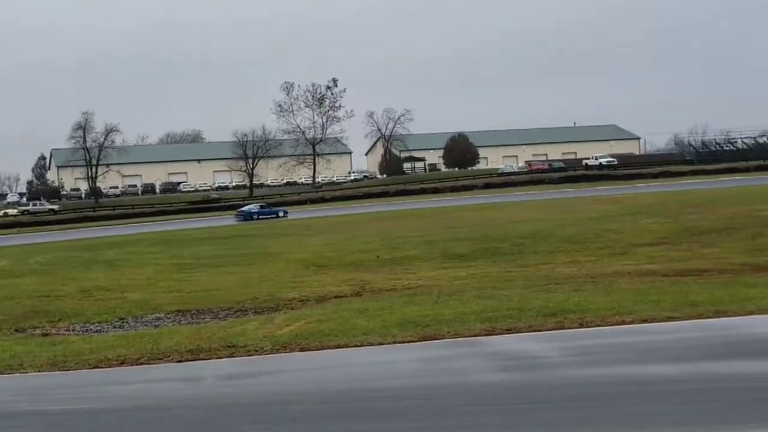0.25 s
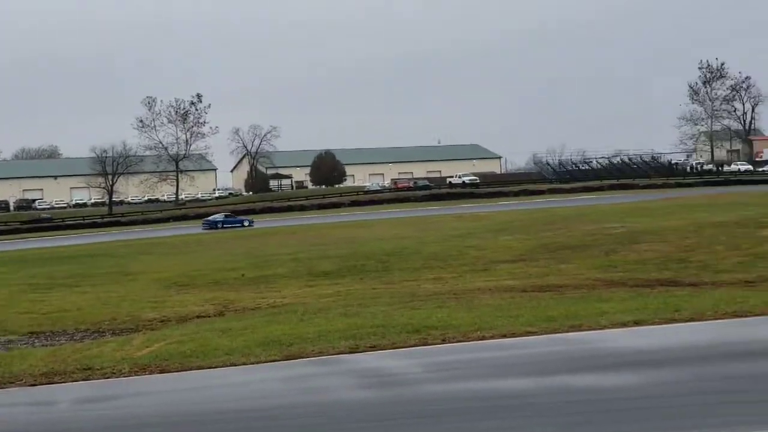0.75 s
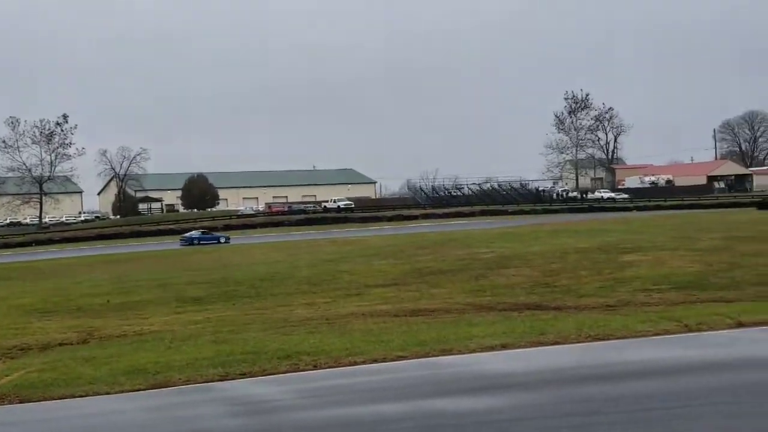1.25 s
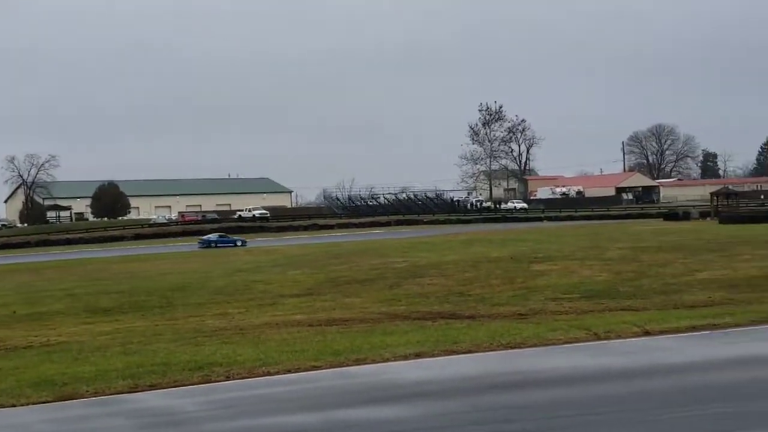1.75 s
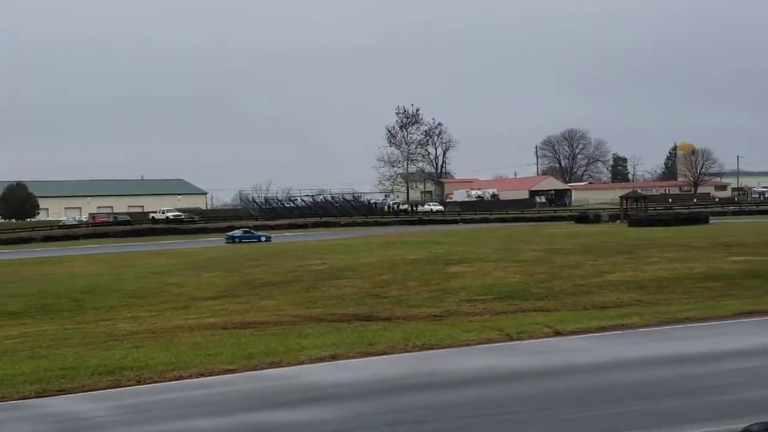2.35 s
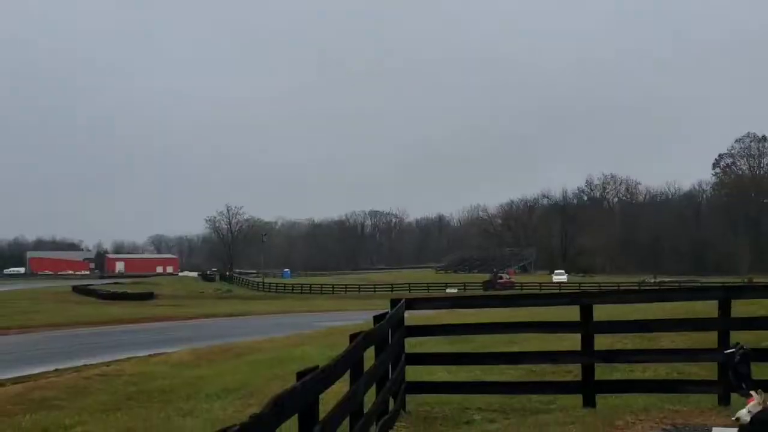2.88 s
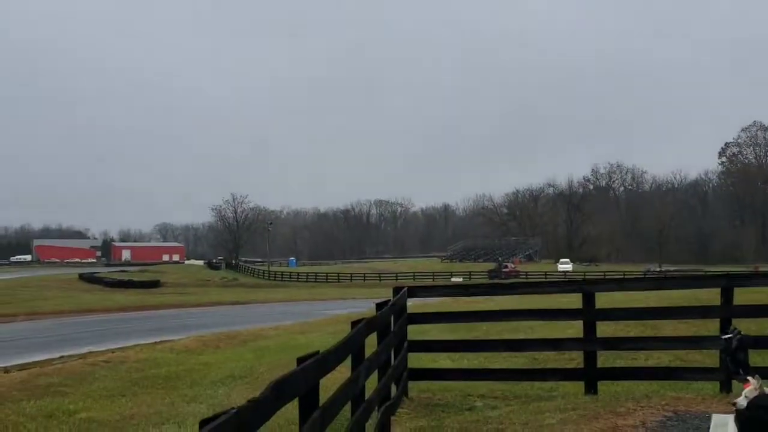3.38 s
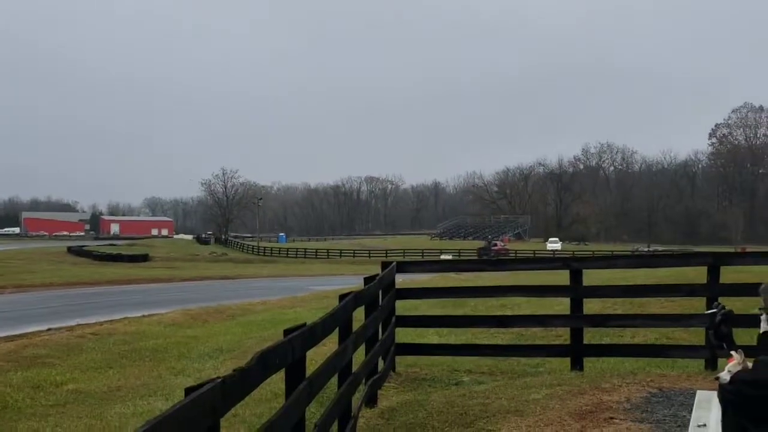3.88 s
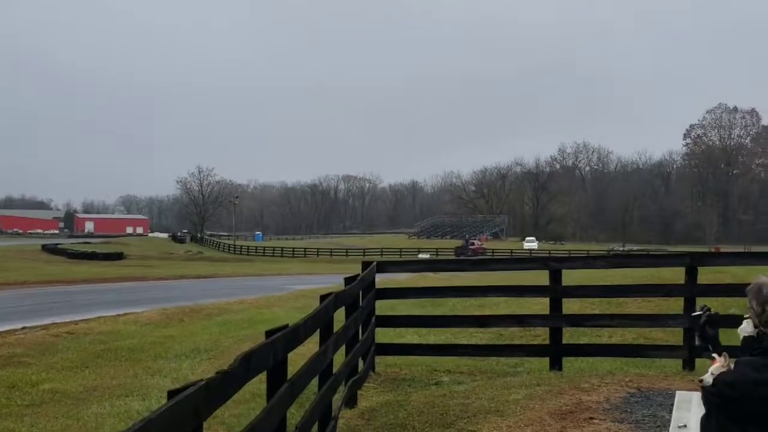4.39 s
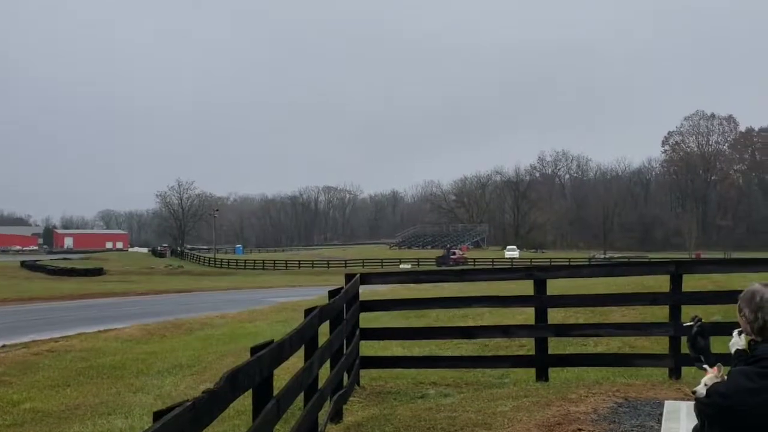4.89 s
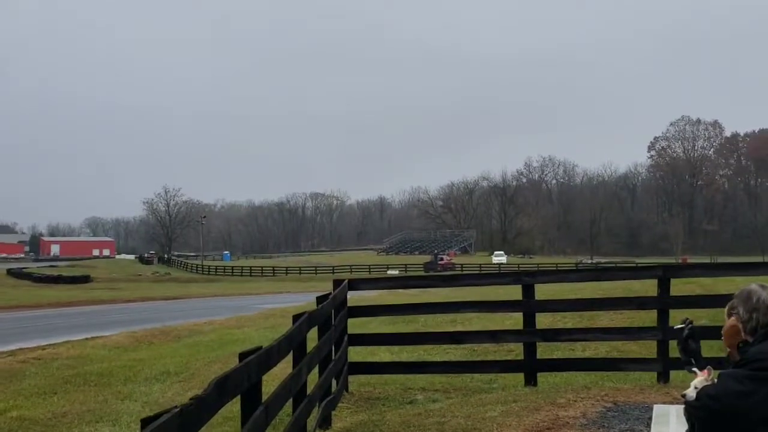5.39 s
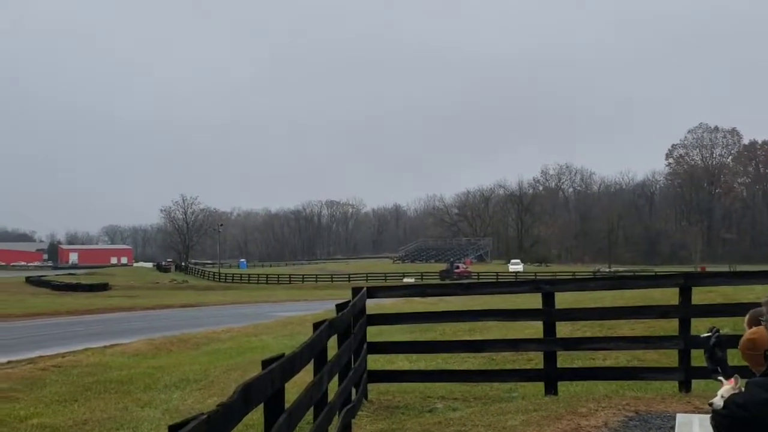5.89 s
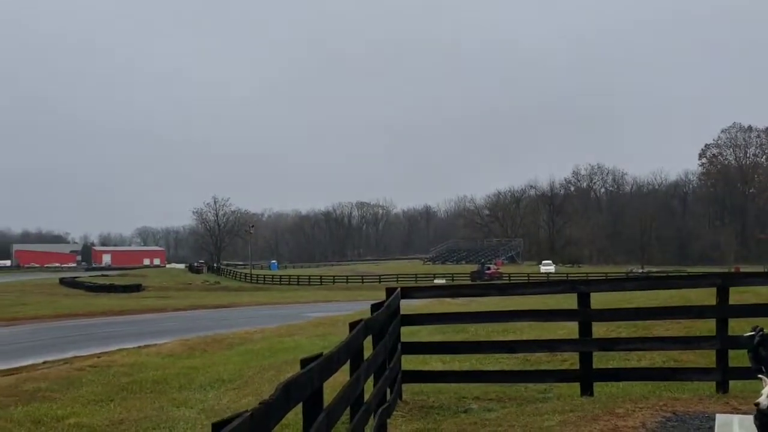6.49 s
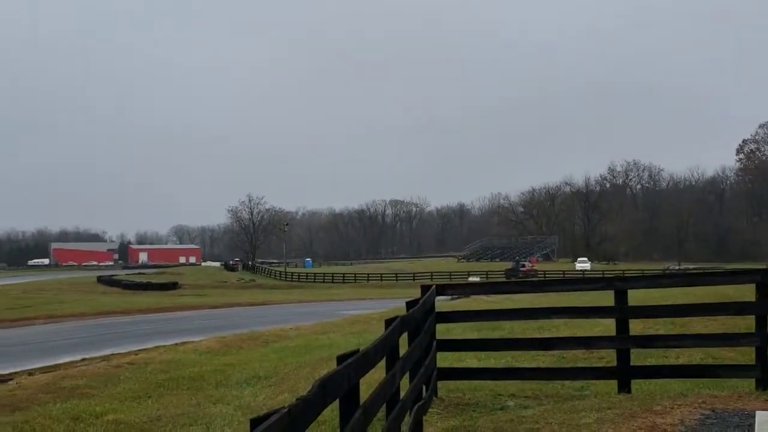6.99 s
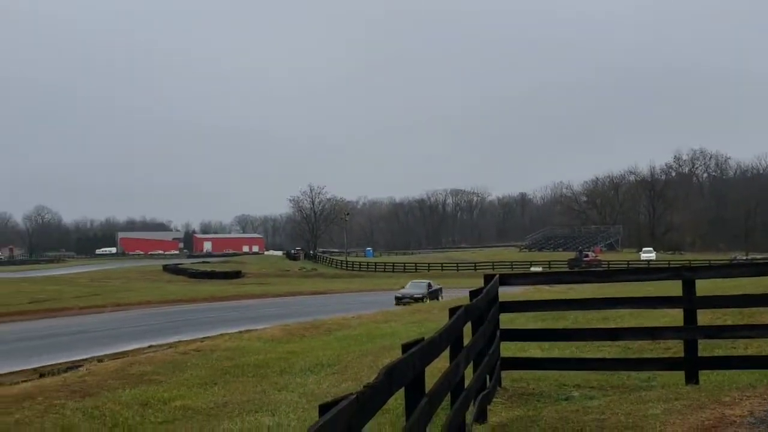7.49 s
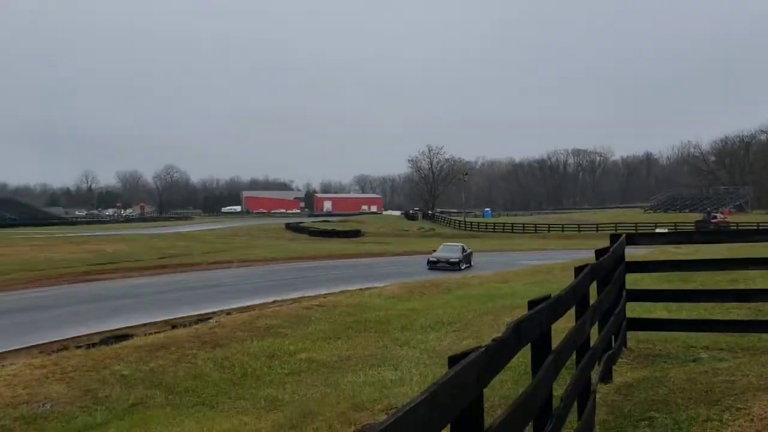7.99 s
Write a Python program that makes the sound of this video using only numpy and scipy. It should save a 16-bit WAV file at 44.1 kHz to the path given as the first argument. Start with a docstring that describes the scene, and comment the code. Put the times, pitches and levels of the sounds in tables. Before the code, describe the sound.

A loud car engine snarls and hisses over wet asphalt, coasts off, then after a brief cut another revs, squeals its tyres and accelerates nearer.

```python
"""Drift cars on a wet circuit

Heard across the grass from two spots with a short silent cut between them. A coupe slides on the throttle, then
coasts off through the spray; next, a far car pulls away while a drifter revs, lifts, squeals through the bend and
accelerates nearer over the paddock's drone. Engines are sums of sines locked to the engine cycle, squealing tyres
are gliding harmonics, both with a noise echo; gas, spray, road, rumble and rustles are coloured noise.
"""
import sys
import numpy as np
from scipy import signal
from scipy.fft import rfft, irfft, next_fast_len
from scipy.io import wavfile
from scipy.ndimage import uniform_filter1d

SR = 44100
rng = np.random.default_rng(int(sys.argv[2]) if len(sys.argv) > 2 else 0)


def pcm_store(signal):
    """Save signal as 16-bit PCM."""
    levels = np.round(np.clip(np.atleast_2d(signal), -1, 1) * 32767)
    wavfile.write(sys.argv[1], SR, levels.astype(np.int16).T)


N = 363823
TIME = np.arange(N) / SR

# engine speed of the sliding coupe: t/s, firing rate f/Hz
COUPE_REVS = [(0, 202.6), (.2, 194.2), (.39, 181.8), (.6, 186.7), (.84, 189.5), (1.01, 217.2),
              (1.15, 210.2), (1.64, 208.3), (2.0, 170), (2.45, 135), (2.85, 115)]
# its firing tone: t/s, level/dB
COUPE_TONE = [(0, -24), (.4, -27.5), (.82, -27.5), (1.0, -40), (1.1, -33), (1.5, -23), (1.75, -31.5),
              (2.12, -39), (2.45, -31.5), (2.85, -35.5)]
# lines around the firing tone: multiple of the cycle rate, relative level/dB
COUPE_BOOM = [(1, -14.5), (2, -6.5), (3, -21), (5, -22), (6, -11.5), (7, -25), (8, -12)]
# bark lines, cycle multiples 9 to 18: relative level/dB
COUPE_BARK = [-1.5, -4.5, -10.5, -7.5, -8, -4, -10.5, -18.5, -7, -15]
# exhaust colours for boom, bark and rasp: f/Hz, level/dB
BOOM_PIPE = [(40, -11.5), (100, 6.5), (200, 2), (280, 5), (370, 0), (420, -9.5)]
COUPE_PIPE = [(300, -25), (520, -14.5), (625, 3), (655, 6.5), (700, -3.5), (740, -6), (900, -10.5)]
RASP_COLOUR = [(900, 5.5), (1020, -7.5), (1220, 0), (1370, -1), (1430, 7), (1490, -2), (1620, -2.5),
               (1730, -30), (1900, -5), (2060, 0.5), (2300, -23), (2650, -3.5), (3000, -28.5)]
# the driver lifts: the bark drops at once, then dies away
LIFT_S, LIFT_TAKES_S, LIFT_DROP_DB, COAST_DB_PER_S = 1.63, 0.08, 9, 23
COUPE_BARK_DB, RASP_RE_BARK_DB = -42.5, -12
# the boom grows with the revs and weakens at the lift
BOOM_DB, BOOM_DB_PER_OCTAVE, BOOM_DROP_DB = -31, 17, 6.5


def coupe_exhaust():
    """Firing pulses make lines at multiples of the engine cycle; bark and rasp need an open throttle."""
    hz, = curves(COUPE_REVS)
    tone_db, = curves(COUPE_TONE)
    octaves, coasting = np.log2(hz / hz[0]), since(LIFT_S)
    lifted = np.minimum(coasting / LIFT_TAKES_S, 1)
    boom_db = BOOM_DB + BOOM_DB_PER_OCTAVE * octaves - BOOM_DROP_DB * lifted
    bark_db = COUPE_BARK_DB - LIFT_DROP_DB * lifted - COAST_DB_PER_S * coasting

    unsteady = 0.0031 * walk(45)  # shared, so all lines waver in pitch together
    boom_orders, boom_strength_db = np.transpose(COUPE_BOOM)
    bark_orders, rasp_orders = np.arange(9, 19), np.arange(19, 58)
    tone = lines(hz, [4], [0], BOOM_PIPE, unsteady, flutter_db=1.1)
    boom = lines(hz, np.round(boom_orders), boom_strength_db, BOOM_PIPE, unsteady, flutter_db=1.8)
    bark = lines(hz, bark_orders, COUPE_BARK, COUPE_PIPE, unsteady, flutter_db=1.5)
    rasp = lines(hz, rasp_orders, -5 * (rasp_orders % 2), RASP_COLOUR, unsteady, flutter_db=5.5)

    exhaust = tone * undb(tone_db) + boom * undb(boom_db)
    exhaust += (bark + rasp * undb(RASP_RE_BARK_DB)) * undb(bark_db)
    return outdoors(exhaust, wet_db=-14, t60=1.0)


# gas colour: f/Hz, level/dB
GAS_COLOUR = [(300, 6), (480, 8.5), (660, 14), (950, -3), (1400, 3.5), (1720, -12), (2050, -4.5),
              (2330, -6), (2680, -2.5), (3500, -2), (5000, -30.5)]
# the rush grows with the revs and fades as the coupe drives away
GAS_DB, GAS_DB_PER_OCTAVE, GAS_DB_PER_S = -47.5, 6.5, -4


def coupe_gas(hz, puffs):
    """Exhaust gas rushes as noise, puffing with each turn of the crank."""
    octaves = np.log2(hz / hz[0])
    return noise(GAS_COLOUR) * puffs * undb(GAS_DB + GAS_DB_PER_OCTAVE * octaves + GAS_DB_PER_S * TIME)


# colours of spray, mist and finest mist: f/Hz, level/dB
SPRAY_COLOUR = [(900, -18), (2000, -4.5), (3000, -7.5), (3350, -6), (3620, 2), (3950, -4.5), (4270, -3),
                (4550, -18.5), (6000, -44)]
MIST_COLOUR = [(2650, -36.5), (4500, -4.5), (5340, -1), (6540, 1.5), (7290, -4.5), (7970, -4.5),
               (9070, -18), (10700, -19), (15600, -39)]
FINE_COLOUR = [(8500, -4), (10000, -2), (11600, 2.5), (13000, -6), (15600, -21.5)]
# standing water under the wheels: t/s, length/s, rise of the spray level/dB
COUPE_PUDDLES = [(-.1, 0.32, 5), (.52, .2, 5), (.93, 0.45, 5.5), (1.88, 0.088, 3), (2.2, .3, 2.5)]
SPRAY_DB, SPRAY_DB_PER_S = -55.5, -0.5
# both mists fade from the lift on; distance takes away the finest first
MIST_DB, MIST_DB_PER_S, FINE_DB, FINE_DB_PER_S = -63, -7, -73.5, -17


def coupe_water(puffs):
    """Tyres throw up water: hissing noise that swells in the puddles."""
    coasting, water_db = since(LIFT_S), splash_db(COUPE_PUDDLES)
    spray_db = SPRAY_DB + SPRAY_DB_PER_S * TIME + water_db + 0.64 * walk(20)
    spray = noise(SPRAY_COLOUR) * puffs ** 0.2 * undb(spray_db)
    mist = noise(MIST_COLOUR) * undb(MIST_DB + MIST_DB_PER_S * coasting)
    mist += noise(FINE_COLOUR) * undb(FINE_DB + FINE_DB_PER_S * coasting)
    return spray + mist * undb(0.77 * water_db + 0.62 * walk(25))


# low rumble, also heard at the bend: f/Hz, level/dB
RUMBLE_COLOUR = [(20, -23.5), (35, -21.5), (55, -9), (80, -0.5), (115, 3), (160, -0.5), (230, -7),
                 (300, -15), (420, -28), (700, -48)]
COUPE_RUMBLE_DB = -37
# a kick of the clutch shakes the drivetrain
KICK_S, KICK_LENGTH_S, KICK_RAMP_S, KICK_DB = 0.93, 0.13, 0.13, 2.5


def coupe_rumble():
    """Low noise that the clutch kick lifts briefly."""
    kick = envelope(KICK_S, KICK_LENGTH_S, KICK_RAMP_S, KICK_RAMP_S)
    return noise(RUMBLE_COLOUR) * undb(COUPE_RUMBLE_DB + KICK_DB * kick)


def coupe():
    """Exhaust, gas, water and rumble of the sliding car, with gas and spray pulsing to the same crank."""
    hz, = curves(COUPE_REVS)
    puffs = undb(2.5 * np.cos(np.pi * np.cumsum(hz) / SR))  # one per two firings
    return coupe_exhaust() + coupe_gas(hz, puffs) + coupe_water(puffs) + coupe_rumble()


# a whistle and a chirp: t/s, length/s, first pitch f/Hz, last pitch f/Hz, level/dB, tilt per harmonic/dB
COAST_CHIRPS = [(1.73, .13, 1950, 1803, -61, -2), (1.92, 0.058, 2280, 2290, -57.5, 0)]


def coast_chirps():
    """A brief gliding whistle, then a short chirp, as the coupe coasts."""
    return tyre(COAST_CHIRPS, [0, -16], jitter=0.022, jitter_rate=580, waver=0.012, flutter_db=5.0)


# engine speed of the approaching car: t/s, firing rate f/Hz
DRIFTER_REVS = [(2.9, 113.1), (4.04, 117.8), (4.24, 162.1), (4.34, 145.6), (4.8, 166.5), (5.33, 205.7),
                (5.53, 160), (5.68, 135.3), (6.0, 101.3), (6.48, 112.6), (6.75, 143.4), (7.07, 155),
                (7.26, 143.4), (7.7, 170.8), (8.25, 213.5)]
# its exhaust colour: f/Hz, level/dB
DRIFTER_PIPE = [(45, -10.5), (90, 1.5), (200, 6), (260, -3.5), (305, 0.5), (400, -12), (520, -18),
                (620, -21), (800, -30.5), (1000, -28.5), (2000, -35.5)]
# throttle bursts: t/s, length/s, firing tone level/dB, bark level/dB before it comes nearer
PULLS = [(2.85, 1.1, -38.5, -64), (3.88, .14, -33, -50.5), (4.048, .2, -32, -46),
         (4.333, 0.078, -45.5, -43), (4.43, 0.96, -34.5, -52), (5.42, 0.099, -35, -48.5),
         (6.127, 0.25, -37.5, -58), (6.543, 0.71, -37.5, -53.5), (7.195, 1.2, -37.5, -62.5)]
THROTTLE_OPEN_S, THROTTLE_CLOSE_S = 0.061, 0.06
IDLE_TONE_DB, IDLE_BARK_DB, OVERRUN_BARK_DB = -53.5, -71, -51
# it rounds the bend and comes nearer (used by the road too)
NEARING_S, NEAR_BARK_DB_PER_S = 7.49, 20


def drifter():
    """Throttle bursts open tone and bark; falling revs make the firings ragged."""
    hz, = curves(DRIFTER_REVS)
    overrun = np.clip(-np.gradient(hz) * SR / 150, 0, 1)  # full when falling 150 Hz a second
    overrun = uniform_filter1d(overrun, size=2048)
    tone_gain = undb(IDLE_TONE_DB)
    bark_gain = undb(IDLE_BARK_DB) + undb(OVERRUN_BARK_DB) * overrun
    for s, length, tone_db, bark_db in PULLS:
        throttle = envelope(s, length, THROTTLE_OPEN_S, THROTTLE_CLOSE_S)
        tone_gain = np.maximum(tone_gain, throttle * undb(tone_db))
        bark_gain = np.maximum(bark_gain, throttle * undb(bark_db))
    jitter = 0.0061 + 0.03 * overrun
    boom, bark = engine(hz, DRIFTER_PIPE, crank_db=-24, cycle_db=-27.5, jitter=jitter, flutter_db=0.0)
    bark_gain = bark_gain * undb(NEAR_BARK_DB_PER_S * since(NEARING_S))
    return outdoors(boom * tone_gain + bark * bark_gain, wet_db=-11.0, t60=0.82)


# squeals: t/s, length/s, first slip rate f/Hz, last slip rate f/Hz, level/dB, tilt per harmonic/dB
SQUEALS = [(6.53, .21, 1140, 1170, -46, -1), (6.75, .13, 1205, 1205, -46, 0),
           (6.86, 0.17, 1170, 1179, -48.5, -1), (6.9, 0.24, 1242, 1232, -54.5, -4),
           (7.03, 0.26, 1135, 1186, -56.5, -0.5), (7.11, .16, 1215, 1243, -49, 2.5),
           (7.3, 0.28, 1183, 1163, -54.5, -2), (7.38, .24, 1225, 1259, -58.5, -1),
           (7.62, 0.32, 1198, 1225, -64, -4)]
# harmonics from the first up: relative level/dB
SQUEAL_HARMONICS = [0, 6.5, 1, -13.5, -22.5]


def squeals():
    """Spinning tyres squeal as the tread sticks and slips."""
    return tyre(SQUEALS, SQUEAL_HARMONICS, jitter=0.0142, jitter_rate=400, waver=0.00994, flutter_db=4.0)


# scrubs: t/s, length/s, first slip rate f/Hz, last slip rate f/Hz, level/dB, tilt per harmonic/dB
SCRUBS = [(5.31, .17, 1318, 1560, -61.5, -4), (5.42, 0.32, 1570, 1570, -67.5, -9.5),
          (5.8, 0.18, 1657, 1860, -68, -16), (5.99, 0.12, 1370, 1430, -56.5, -1),
          (6.08, 0.14, 1593, 1578, -56.5, -8.5), (6.22, 0.13, 1369, 1400, -55, -4),
          (6.35, 0.41, 1542, 1569, -58.5, -6), (6.52, 0.24, 1406, 1360, -53, 2.5),
          (6.76, 0.42, 1690, 1671, -62, -15.5), (6.75, .47, 1451, 1425, -56, 1),
          (7.22, 0.55, 1452, 1403, -55, -0.5), (7.2, 0.5, 1633, 1590, -73, -13)]
# harmonics from the first up: relative level/dB
SCRUB_HARMONICS = [1.5, 1.5, -7, -16.5]


def scrubs():
    """Tyres scrub sideways; a less steady slip rate makes the rasp hoarse."""
    return tyre(SCRUBS, SCRUB_HARMONICS, jitter=0.0398, jitter_rate=500, waver=0.025, flutter_db=3.5)


# far car: t/s, firing rate f/Hz, firing tone level/dB
FAR_CAR = [(2.9, 164.4, -41.5), (3.35, 178.9, -38.5), (3.92, 192.9, -38), (4.4, 199.9, -42.5),
           (5.3, 205.2, -43), (6.3, 204, -69)]
# its exhaust colour: f/Hz, level/dB
FAR_PIPE = [(45, -14.5), (90, 5), (180, 4), (270, -2), (350, -3), (460, -28), (560, -21.5), (690, -14.5),
            (900, -43), (2000, -42.5)]


def far_car():
    """A second engine pulls slowly and fades behind the trees."""
    hz, tone_db = curves(FAR_CAR)
    boom, bark = engine(hz, FAR_PIPE, crank_db=-3.5, cycle_db=-13, jitter=0.0051, flutter_db=2.5)
    return outdoors((boom + bark * undb(-12.5)) * undb(tone_db), wet_db=-18, t60=0.75)


# tyre roar and water hiss colours: f/Hz, level/dB
ROAR_COLOUR = [(250, 8), (470, 4), (660, 2), (900, 0), (1120, -4.5), (1600, -3.5), (2000, -7), (2400, -4.5),
               (3100, -16.5), (5000, -26)]
WASH_COLOUR = [(1500, 0.5), (2600, 6.5), (3600, 6.5), (4600, 5), (6000, 0.5), (6800, -11), (8500, -49),
               (11000, -25.5), (15500, -19)]
# standing water at the bend: t/s, length/s, rise of the spray level/dB
BEND_PUDDLES = [(3.37, 0.54, 6), (4.08, 0.26, 5.5), (4.3, 1.2, 4.5), (5.98, 0.86, 6.5), (6.53, 0.42, 10)]
# levels before the car comes nearer; the high sounds then gain most
ROAR_DB, WASH_DB, FAR_MIST_DB = -54, -68, -102
NEAR_ROAR_DB_PER_S, NEAR_WASH_DB_PER_S, NEAR_MIST_DB_PER_S = 7.5, 10.5, 34
# the tyres roar less while they slide
SLIDE_S, SLIDE_LENGTH_S, SLIDE_RAMP_S, SLIDE_DIP_DB = 5.72, 1.05, 0.5, 1.5


def road():
    """Tyres roar on asphalt and hiss through water; the finest spray carries only from close by."""
    nearing = since(NEARING_S)
    slide = envelope(SLIDE_S, SLIDE_LENGTH_S, SLIDE_RAMP_S, SLIDE_RAMP_S)
    roar_db = ROAR_DB - SLIDE_DIP_DB * slide + NEAR_ROAR_DB_PER_S * nearing + 0.63 * walk(14)
    wash_db = WASH_DB + splash_db(BEND_PUDDLES) + NEAR_WASH_DB_PER_S * nearing + 0.89 * walk(17)
    mist = noise([(6500, -2), (8000, 3.0), (10000, -5.5), (14000, -8.0)])
    mist = mist * undb(FAR_MIST_DB + NEAR_MIST_DB_PER_S * nearing)
    return noise(ROAR_COLOUR) * undb(roar_db) + noise(WASH_COLOUR) * undb(wash_db) + mist


# low rumble at the bend: t/s, level/dB
BEND_RUMBLE = [(2.9, -45), (3.3, -41), (4.2, -37), (4.6, -42), (5.7, -40.5), (6.3, -45), (6.8, -41),
               (7.3, -42.5), (8.25, -39)]


def bend_rumble():
    """The circuit rumbles as low noise of changing level."""
    return noise(RUMBLE_COLOUR) * undb(curves(BEND_RUMBLE)[0])


# small ticks close by: t/s, level/dB
TICKS = [(4.129, -54), (4.43, -50), (4.5, -54)]


def ticks():
    """Tiny dry clicks: noise that starts at once and dies within milliseconds."""
    clicks = sum(undb(db) * (TIME > s) * np.exp(-np.abs(TIME - s) / 0.0019) for s, db in TICKS)
    return clicks * noise([(2500, 3), (6000, 0.5), (9000, -25), (15000, -19)])


# faint rustles close by: t/s, length/s, level/dB
RUSTLES = [(1.22, 0.48, -74), (1.401, .15, -70), (4.256, .07, -75), (4.44, .17, -76), (4.63, .025, -71.5)]
RUSTLE_ATTACK_S, RUSTLE_RELEASE_S, RUSTLE_FLOOR_DB = 0.02, 0.04, -105


def rustle():
    """Faint, high rustling close by: noise with a quick random flutter."""
    gain = undb(RUSTLE_FLOOR_DB)
    for s, length, db in RUSTLES:
        gain = gain + undb(db) * envelope(s, length, RUSTLE_ATTACK_S, RUSTLE_RELEASE_S)
    return noise([(8000, -13.0), (11000, -13.0), (13000, 0.5), (15500, -3.5)]) * gain * undb(2.5 * walk(120))


# waiting engines: f/Hz, level/dB at the height of the swell
DRONE = [(80, -45), (116, -52), (270, -54.5)]
# the drone swells and ebbs once
DRONE_PEAK_S, DRONE_WIDTH_S, DRONE_EBB_DB = 5.2, 1.5, 8.5


def paddock():
    """Waiting engines drone as sines of wavering pitch and level."""
    drone = np.zeros(N)
    for hz, db in DRONE:
        phase = 2 * np.pi * np.cumsum(hz + 2.37 * walk(14)) / SR
        drone += undb(db + 3.6 * walk(9)) * np.sin(phase)
    swell = np.exp(-((TIME - DRONE_PEAK_S) / DRONE_WIDTH_S) ** 2)
    return np.sqrt(2) * drone * undb(DRONE_EBB_DB * (swell - 1))


# thin whine: f/Hz, level/dB
WHINE = [(2118, -72), (4942, -74.5), (6352, -87), (7763, -82)]


def whine():
    """Thin steady sines that stop abruptly."""
    tones = sum(np.sqrt(2) * undb(db) * np.sin(2 * np.pi * hz * TIME) for hz, db in WHINE)
    return (TIME < 4.27) * tones


def engine(hz, pipe, crank_db, cycle_db, jitter, flutter_db):
    """A four-cylinder: returns the firing tone with its undertones, and the overtones above it."""
    unsteady = jitter * walk(45)
    low, high = np.arange(1, 6), np.arange(6, 29)
    # unequal cylinders add lines between the firing harmonics
    uneven = np.array([0, cycle_db, crank_db, cycle_db])
    return [lines(hz, k, uneven[k % len(uneven)], pipe, unsteady, flutter_db) for k in (low, high)]


def lines(hz, orders, strength_db, pipe, jitter, flutter_db):
    """Sines at multiples of the engine cycle (four firings), coloured by the pipe; rms 1 before flutter."""
    cycle = 2 * np.pi * np.cumsum(hz * (1 + jitter)) / SR / 4
    slow, slow_hz = TIME[::256], hz[::256]
    gains = [undb(db) * colour_at(slow_hz * k / 4, pipe) for k, db in zip(orders, strength_db)]
    gains = np.array(gains) / np.linalg.norm(gains, axis=0)
    out = np.zeros(N)
    for k, gain in zip(orders, gains):
        # moving air fades each line on its own
        gusts = np.interp(slow, np.linspace(0, TIME[-1], num=110), rng.standard_normal(110))
        gain = np.interp(TIME, slow, gain * undb(flutter_db * gusts))
        out += gain * np.sin((k * cycle + rng.uniform(0, 2 * np.pi)).astype(np.float32))
    return np.sqrt(2) * out


BITE_S, LET_GO_S = 0.042, 0.035


def tyre(slips, harmonics, jitter, jitter_rate, waver, flutter_db):
    """Tread sticks and slips at an unsteady, gliding rate, biting in bursts as it finds dry patches."""
    out = np.zeros(N)
    for s, length, first_hz, last_hz, db, tilt_db in slips:
        now = np.flatnonzero(TIME >= s)[:SR]
        size = len(now)
        hz = np.interp(TIME[now], [s, s + length], [first_hz, last_hz])
        hz = hz * (1 + jitter * walk(jitter_rate, size) + waver * walk(45, size))
        slip = 2 * np.pi * np.cumsum(hz) / SR
        tone = np.zeros(size)
        for k, harmonic_db in enumerate(harmonics):
            gain = undb(harmonic_db + k * tilt_db + flutter_db * walk(35, size))
            tone += gain * np.sin((k + 1) * slip)
        out[now] += unit(tone) * undb(db) * envelope(s, length, BITE_S, LET_GO_S)[now]
    return outdoors(out, wet_db=-2, t60=0.68)


PUDDLE_ATTACK_S, PUDDLE_RELEASE_S = 0.068, 0.11


def splash_db(puddles):
    """The spray rises while the wheels are in a puddle."""
    rises = [db * envelope(s, length, PUDDLE_ATTACK_S, PUDDLE_RELEASE_S) for s, length, db in puddles]
    return np.max(rises, axis=0)


def outdoors(x, wet_db, t60):
    """Add the scattered echo of trees and buildings: decaying noise after a 30 ms gap."""
    t = TIME[:SR]
    tail = rng.standard_normal(SR) * undb(-60 * t / t60) * (t > 0.03)
    return x + undb(wet_db) * signal.fftconvolve(x, tail / np.linalg.norm(tail))[:N]


def noise(colour):
    """Coloured noise of rms 1 that dies away outside its colour's range."""
    size = next_fast_len(N)
    hz = np.arange(size // 2 + 1) * SR / size
    skirts = np.minimum(hz / colour[0][0], 1) ** 2 / np.maximum(hz / colour[-1][0], 1) ** 2
    spectrum = rfft(rng.standard_normal(size)) * colour_at(hz, colour) * skirts
    return unit(irfft(spectrum, size)[:N])


def colour_at(hz, colour):
    """Gain of an (f/Hz, level/dB) colour at the given frequencies."""
    f, db = np.transpose(colour)
    return undb(np.interp(np.log(hz + 1e-9), np.log(f), db))


def walk(rate, size=N):
    """Smooth random wandering with a spread near 1, given a new target `rate` times a second."""
    k = max(int(SR / rate), 2)
    held = np.repeat(rng.standard_normal(size // k + 2), k)
    return np.sqrt(3 / 2) * uniform_filter1d(held, k)[k // 2:k // 2 + size]


def envelope(start, length, attack, release):
    """Rises to 1, holds until the length is over, then falls to 0."""
    return np.clip(np.minimum((TIME - start) / attack, 1 - (TIME - start - length) / release), 0, 1)


def since(s):
    """Seconds gone by since a moment; 0 before it."""
    return np.maximum(TIME - s, 0)


def curves(table):
    """The columns of a table after its times, as one value a sample."""
    s, *columns = np.transpose(table)
    return [np.interp(TIME, s, c) for c in columns]


def undb(db):
    """Decibels to gain."""
    return 10 ** (np.asarray(db) / 20)


def unit(x):
    """Scale to rms 1."""
    return x / np.sqrt(np.mean(x ** 2))


CUT_START_S, CUT_END_S = 2.854, 2.886
# after the cut all but the whine and the rustles fade in
FADE_IN_DB, FADE_IN_S = 6.5, 0.08


def scene():
    """The first spot, a moment of silence, then the bend."""
    slide = coupe() + coast_chirps()
    bend = drifter() + squeals() + scrubs() + far_car() + road() + bend_rumble() + ticks() + paddock()
    bend = bend * undb(-FADE_IN_DB * np.exp(-since(CUT_END_S) / FADE_IN_S)) + whine()
    close = rustle()
    before = uniform_filter1d(1.0 * (TIME < CUT_START_S), size=16)  # softened edges
    after = uniform_filter1d(1.0 * (TIME > CUT_END_S), size=16)
    return ((slide + close) * before + (bend + close) * after)[None]


TOP_HZ = 15700


def record(dry):
    """The recorder cuts the top with a steep low-pass."""
    return signal.sosfilt(signal.ellip(10, 0.1, 80, TOP_HZ, fs=SR, output="sos"), dry)


dry = scene()
out = record(dry)
pcm_store(out)
```